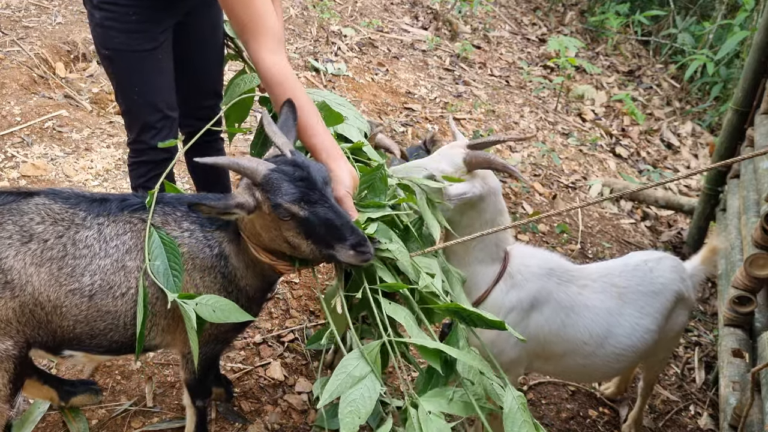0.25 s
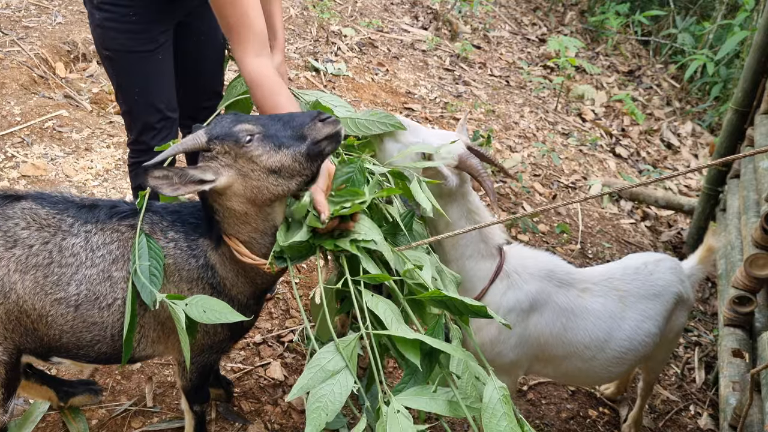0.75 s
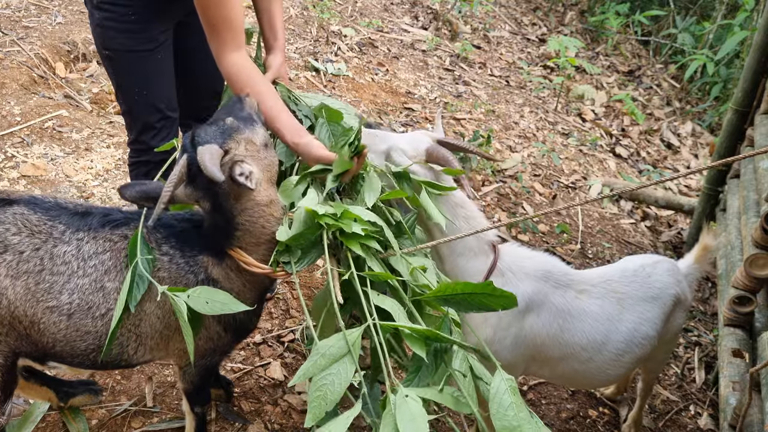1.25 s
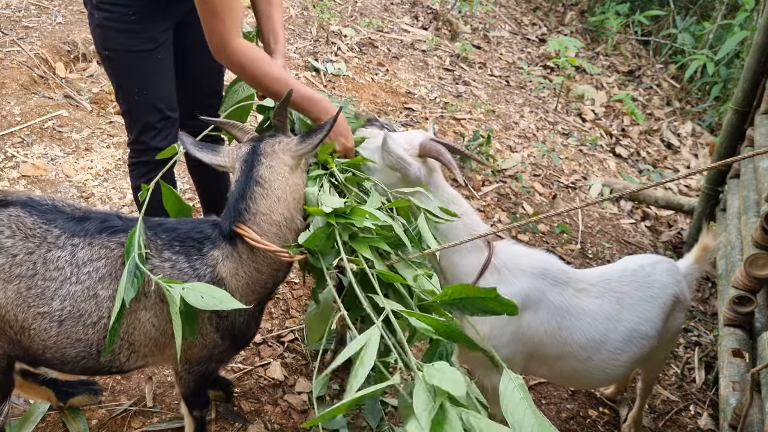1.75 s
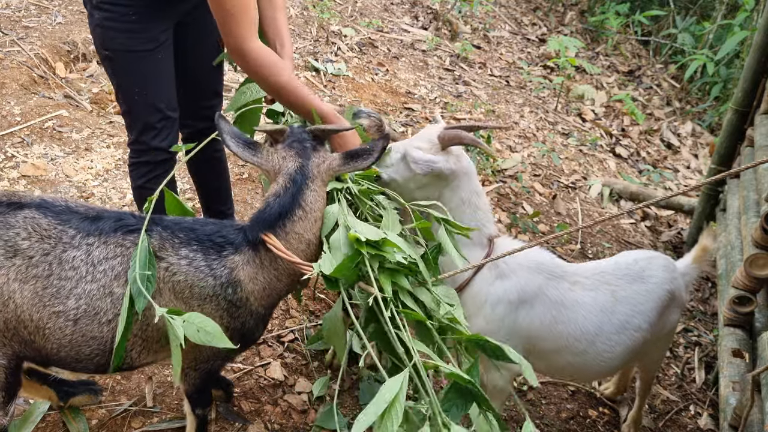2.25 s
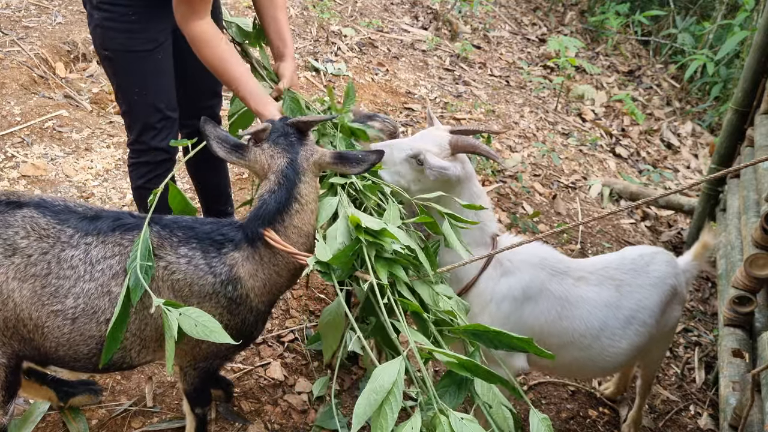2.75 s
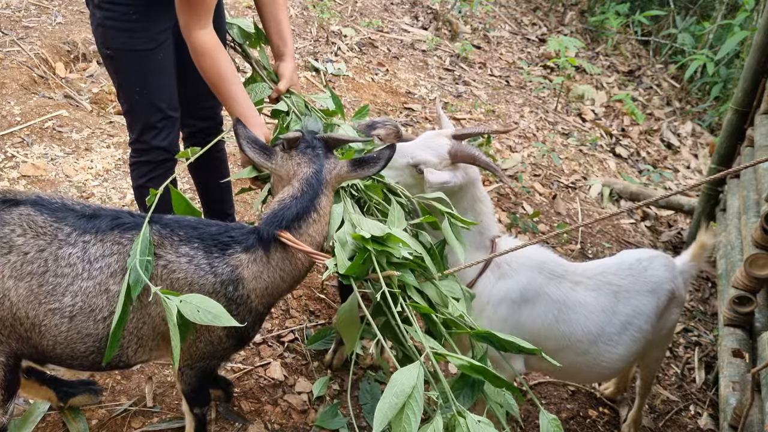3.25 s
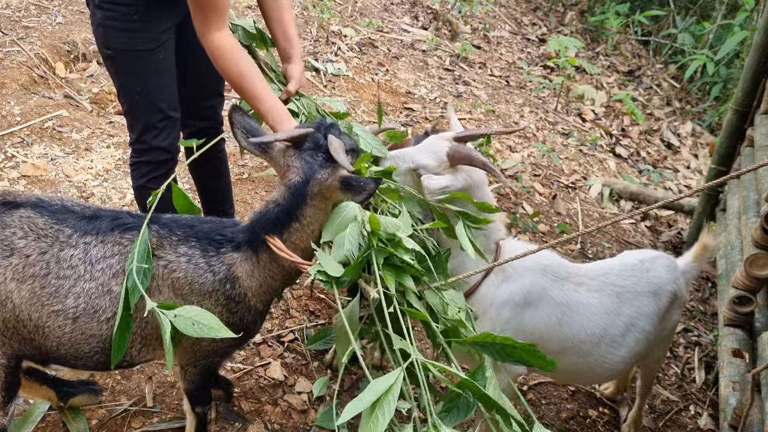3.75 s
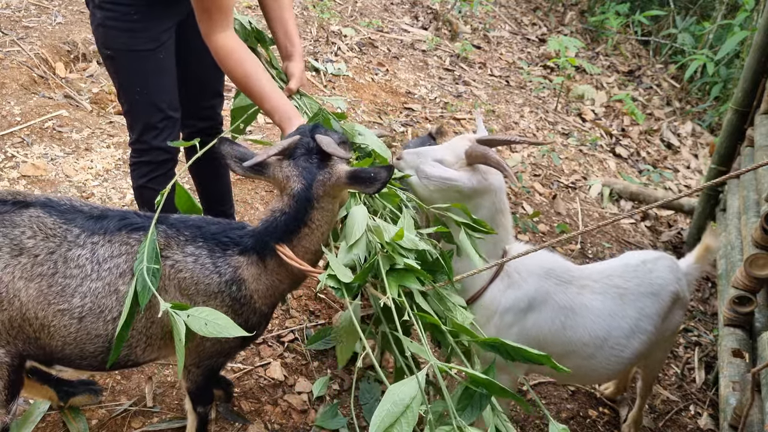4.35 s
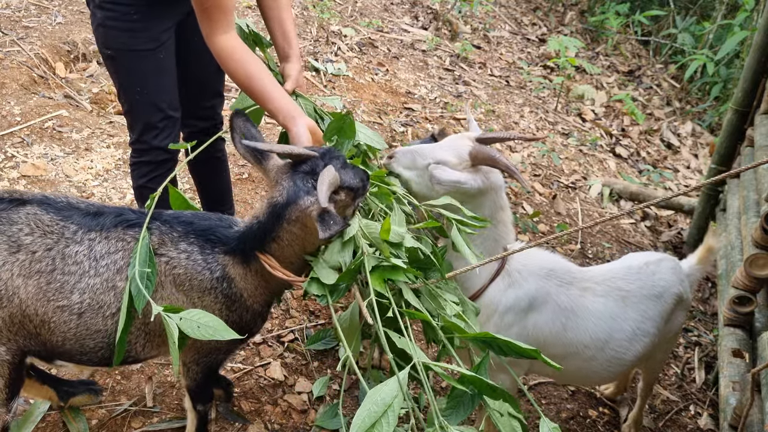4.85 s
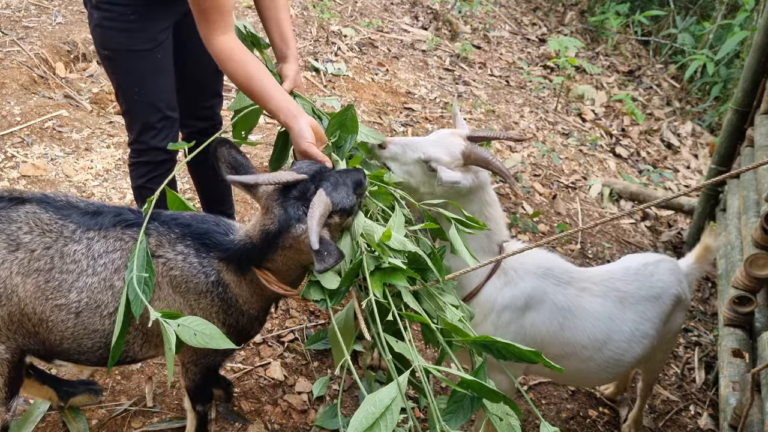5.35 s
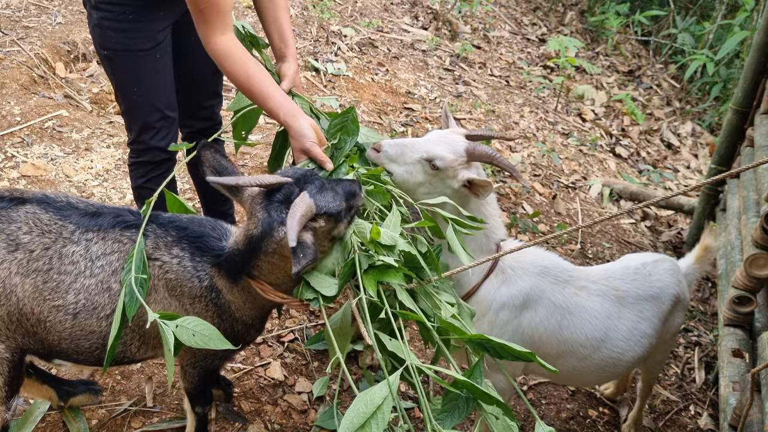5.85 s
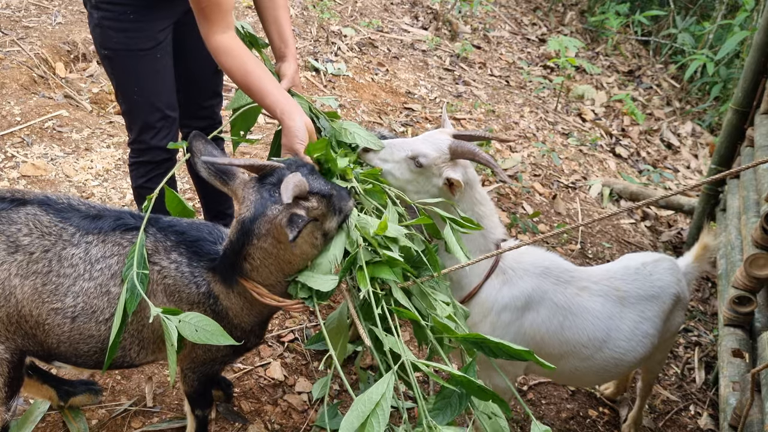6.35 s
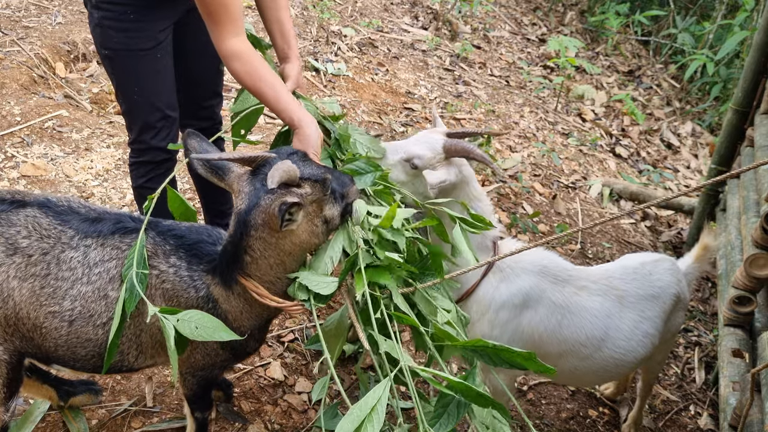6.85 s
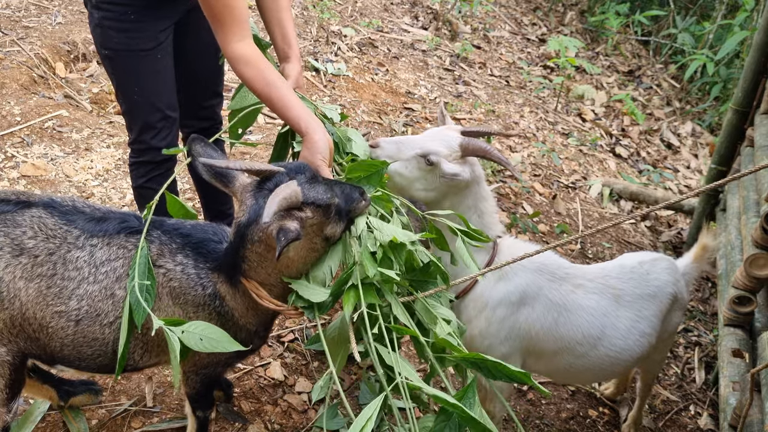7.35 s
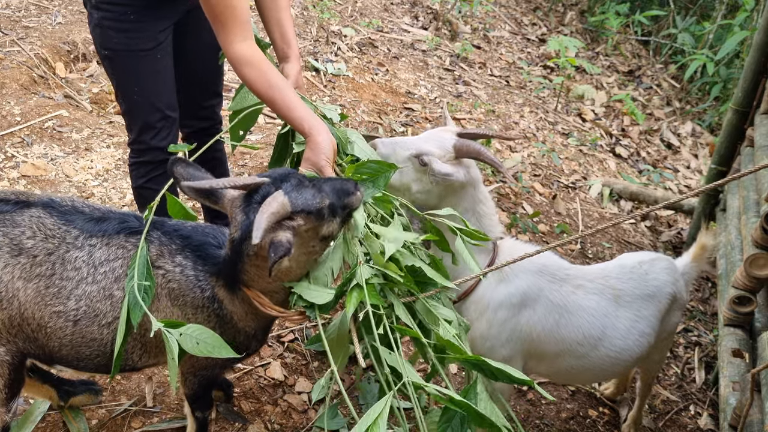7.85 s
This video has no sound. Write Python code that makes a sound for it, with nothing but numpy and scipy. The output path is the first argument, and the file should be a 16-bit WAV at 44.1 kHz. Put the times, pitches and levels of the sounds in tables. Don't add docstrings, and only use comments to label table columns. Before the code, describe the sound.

Close outdoor stereo from a handheld phone: goats feeding on branches, quiet at first with soft thuds, then busier with sharp wood cracks and tearing leaves. One short, dull-ended bell clink sounds in the first half; other bell touches are barely audible. The snapping returns in bursts toward the end. Behind it lie a steady high cicada hiss, distant bird whistles and faint wind rumble, with little echo.

```python
import sys
import numpy as np
from scipy import signal
from scipy.fft import rfft, irfft
from scipy.io import wavfile
from scipy.ndimage import uniform_filter1d

SR = 44100
rng = np.random.default_rng(int(sys.argv[2]) if len(sys.argv) > 2 else 0)


def to_linear_factor(level_db):
    exponent = np.asarray(level_db, float) / 20
    return 10 ** exponent


def bounce(signal):
    frames = np.transpose(np.atleast_2d(signal))
    limited = np.clip(frames, -1, 1)
    pcm = np.round(limited * 32767).astype(np.int16)
    wavfile.write(sys.argv[1], SR, pcm)


N = 356769
T = np.arange(N) / SR

# (frequency [Hz], density [dB per Hz]), and its treble continuation
AIR_SPECTRUM = [(15, -59), (25, -32), (40, -10), (71, -3), (154, -5), (188, -5), (342, -7.5), (399, -8),
                (499, -2.5), (927, -4.5), (1080, -7), (5000, -14), (6500, -55), (11000, -120)]
AIR_TREBLE = [(6000, -19), (8000, -32), (9500, -38), (16000, -29)]
# (frequency [Hz], coherence [0-1])
COHERENCE = [(60, 0.94), (130, 0.86), (290, 1), (640, 0.39), (1410, -0.12), (3100, -0.0), (6820, 0.27),
             (15000, 0.3)]
# (frequency [Hz], left minus right [dB])
AIR_BALANCE = [(60, 4.5), (110, 3.5), (200, 4.5), (380, 1), (700, 4), (1290, -2), (2380, 1.5), (4400, -7),
               (8120, 38), (15000, -20)]
# (centre [Hz], width [Hz], level [dB], left minus right [dB])
CHOIRS = [
    (5768, 540, -58.5, 7),
    (6612, 150, -77, 25),
    (5424, 590, -64.5, -4),
]
# (time [s], pitch [Hz], level [dB])
NEAR_CICADA = [(0, 8100, -85), (.9, 8200, -79), (1.3, 8250, -70), (1.7, 7850, -68.5), (2.2, 7500, -69),
               (2.4, 7600, -78), (8.09, 7800, -78)]
# (time [s], pitch [Hz], level [dB])
HIGH_CICADA = [(0, 10400, -92), (.35, 10400, -82), (.8, 10100, -83), (1.2, 9600, -87), (1.5, 9400, -100),
               (8.09, 9400, -100)]
# (time [s], length [s], start pitch [Hz], rise [Hz], level [dB])
BIRD_NOTES = [(0, .25, 3680, 30, -63), (.29, .11, 3400, -20, -67), (1.64, .05, 4150, 80, -64),
              (1.83, .05, 2600, 40, -66), (2.0, .13, 3750, 50, -68), (2.95, .3, 3660, 170, -66),
              (3.45, .3, 3630, 90, -66), (5.9, .24, 3660, 140, -64), (6.33, .3, 3650, 220, -64),
              (6.77, .04, 4550, 90, -66), (6.9, .27, 3680, 70, -66), (7.43, .25, 3660, 20, -64),
              (7.68, .04, 3450, -150, -69)]
# (time [s], length [s], pitch [Hz], level [dB], swell over the length [dB])
WHISTLES = [
    (.04, .19, 4505, -61, 6),
    (.465, .19, 4035, -62, -1),
]
# (time of peak [s], level [dB])
PUFFS = [(.03, -70), (.57, -57), (1.44, -65), (2.12, -69), (2.55, -61), (2.98, -58.5), (3.3, -63),
         (3.62, -59.5), (4.03, -63.5), (4.88, -65), (5.27, -65), (5.58, -62), (5.74, -60.5), (6.31, -74),
         (6.64, -60.5), (6.96, -66.5), (7.28, -69), (8.02, -71)]
# (time [s], level [dB], resonance [Hz], t60 [s])
THUDS = [(0.281, -54, 246, 0.2), (0.543, -52.5, 340, 0.077), (1.119, -65, 183, 0.12),
         (1.38, -57, 132, 0.16), (1.549, -56.5, 334, 0.18), (2.138, -60, 206, 0.32),
         (2.816, -53.5, 238, 0.14), (3.658, -60.5, 186, 0.092), (4.015, -59, 225, 0.17),
         (6.039, -61.5, 261, 0.16), (7.43, -72, 139, 0.12), (7.783, -57.5, 282, 0.35),
         (7.829, -55.5, 149, 0.14)]
# (time [s], level [dB])
STIRRING = [(0.0, -71.5), (0.11, -77.5), (1.96, -68.5), (2.46, -71.5), (2.7, -62), (2.86, -71.5),
            (3.06, -72.5), (3.85, -70), (4.35, -75.5), (4.89, -73), (5.29, -76), (6.22, -74.5), (6.74, -74),
            (7.1, -67), (7.48, -75.5), (8.09, -73)]
# (time [s], crisp top [dB], wood pitch [Hz], wood level [dB])
TWIGS = [(1.2256, -50, 703, -46), (1.5347, -37.5, 3700, -43.5), (1.9215, -53, 2500, -54),
         (1.9434, -63, 2850, -41.5), (2.0042, -64, 3790, -43), (2.128, -54, 2870, -33.5),
         (2.1513, -56, 3300, -27), (2.2638, -61, 3820, -53), (2.4838, -51, 3440, -44),
         (3.253, -62, 3690, -48), (3.4707, -52, 791, -45), (4.0118, -61, 3200, -35),
         (4.0196, -51, 1670, -42), (4.8299, -50, 1730, -53), (5.9924, -60, 1660, -48),
         (6.0196, -57, 1860, -40), (6.0287, -47, 1780, -45), (6.2884, -57, 1160, -49),
         (6.8776, -47.5, 1680, -36.5), (6.9726, -33.5, 1690, -35), (7.2664, -64, 1480, -46),
         (7.501, -36, 1330, -49), (7.5151, -39, 1330, -46.5), (7.677, -52, 3560, -59)]
# (time [s], crisp top [dB], body pitch [Hz], body level [dB])
SPLASH_AND_CRACK = [
    (2.537, -37.5, 4570, -36),
    (2.817, -36, 4230, -49),
]
# (time [s], level [dB], pitch [Hz])
TICKS = [(1.398, -62, 4000), (2.6618, -44, 2500), (2.868, -52, 4000), (3.386, -50, 4200),
         (3.416, -62, 3000), (3.449, -55, 1500), (3.929, -55, 3000), (4.267, -53.5, 2000),
         (4.889, -50.5, 3700), (4.977, -57, 1500), (5.151, -50.5, 3000), (5.195, -53, 1200),
         (5.512, -52.5, 7500), (5.626, -52, 1400), (5.856, -57, 800), (6.135, -58, 1200),
         (5.932, -62, 1400), (7.113, -53, 1500), (7.386, -58, 1300), (7.723, -56, 3500), (7.823, -54, 1300)]
# (time [s], crisp top [dB], stem pitch [Hz], stem level [dB], t60 [s])
TEARS = [(1.23, -57, 3200, -51, .18), (1.541, -46, 1500, -56, 0.092), (2.117, -56, 1390, -41.5, 0.16),
         (2.136, -47, 1180, -39, 0.11), (2.141, -54, 3000, -35, .08), (2.157, -55, 3370, -45, 0.16),
         (2.826, -48, 3500, -50, .1), (2.84, -53, 2800, -51, 0.13), (3.618, -58, 3300, -59, 0.59),
         (4.037, -51, 2740, -43, 0.13), (4.047, -55, 940, -46.5, 0.17), (4.056, -55, 1700, -49, 0.15),
         (4.745, -61, 1200, -58, .2), (6.009, -59, 1300, -45, .15), (6.024, -53, 3500, -45, 0.17),
         (5.96, -62, 1000, -53.5, .25), (6.053, -59, 1440, -46.5, .2), (6.914, -53, 3520, -48.5, 0.12),
         (6.951, -50, 1700, -42, 0.057), (6.976, -50, 4520, -37, 0.094), (7.322, -71, 1800, -45.5, .12),
         (7.338, -65, 1100, -46, .08), (8.005, -62, 1900, -50, .35)]
# (frequency [Hz], level [dB], t60 [s], left minus right [dB])
HUM = [
    (1466.4, -15.8, .454, -3.6),
    (1452.2, -24.3, .32, -1.5),
    (1479.3, -31, .8, -3),
]
UPPER_HZ = [3800, 3931, 3919, 4900, 7219, 7320, 9140, 9727, 10050, 10213, 11545, 12426, 13825, 14570]
# (level [dB], t60 [s], left minus right [dB])
UPPER_MODES = [(-43, 0.14, -13), (-36.5, 0.11, -22), (-51, 0.9, -13), (-52, 0.05, 2), (-48, .17, 15),
               (-34, 0.17, 15), (-50, .13, 6), (-49, 0.13, 20), (-57, .1, 6), (-47, 0.13, 5),
               (-51, 0.09, 11), (-44, 0.12, 15), (-45, 0.12, 12), (-60, .07, 6)]
# (time [s], strength [dB], contact [s], time until the ring is smothered [s])
STRIKES = [
    (.02, -46, .004, .5),
    (.09, -48, .004, .5),
    (.17, -46, .004, .15),
    (2.5367, .1, .0034, .225),
    (3.75, -46, .004, .15),
]

PORT_LAG = 17


def unit(x):
    return x / np.sqrt(np.mean(x ** 2))


def sides(db):
    return to_linear_factor(np.array([[.5], [-.5]]) * db)


def band(x, lo_hz, hi_hz, order=2):
    sos = signal.butter(order, [lo_hz, min(hi_hz, .45 * SR)], "band", fs=SR, output="sos")
    return signal.sosfilt(sos, x)


def walk(rate_hz):
    hold = int(SR / rate_hz)
    steps = np.repeat(rng.standard_normal(N // hold + 1), hold)[:N]
    smooth = uniform_filter1d(uniform_filter1d(steps, hold), hold)
    return smooth / smooth.std()


def on_log(hz, table):
    f, value = np.transpose(table)
    return np.interp(np.log(hz + 1), np.log(f + 1), value)


def add(out, s, x):
    i = int(s * SR)
    out[:, i:i + x.shape[1]] += x[:, :N - i]


def narrow(hz, half_width_hz):
    low_pass = signal.butter(2, half_width_hz, fs=SR, output="sos")
    slow = signal.sosfilt(low_pass, rng.standard_normal((2, 2, N)))
    phase = 2 * np.pi * np.cumsum(hz) / SR
    return unit(slow[0] * np.sin(phase) + slow[1] * np.cos(phase))


def air():
    hz = np.arange(N // 2 + 1) * SR / N
    shared, left, right = rfft(rng.standard_normal((3, N)))
    late = shared * np.exp(-2j * np.pi * hz * PORT_LAG / SR)
    coherence = np.clip(on_log(hz, COHERENCE), 0, 1)
    common = np.sqrt(coherence) * np.array([late, shared])
    ports = common + np.sqrt(1 - coherence) * np.array([left, right])
    colour = to_linear_factor(on_log(hz, AIR_SPECTRUM[:-1] + AIR_TREBLE)) * sides(on_log(hz, AIR_BALANCE))
    wash = irfft(ports * colour, N)
    return unit(wash) * to_linear_factor(-58.5 + 0.53 * walk(3.52))


def cicadas():
    out = np.zeros((2, N))
    for hz, width_hz, db, pan_db in CHOIRS:
        choir = band(rng.standard_normal((2, N)), hz - width_hz / 2, hz + width_hz / 2)
        swell_db, flicker_db = 0.2 * walk(1.6), 1.1 * walk(40)
        out += unit(choir) * to_linear_factor(db + swell_db + flicker_db) * sides(pan_db)
    for singer in (NEAR_CICADA, HIGH_CICADA):
        s, hz, db = np.transpose(singer)
        level = to_linear_factor(np.interp(T, s, db) + 1.5 * walk(14))
        out += narrow(np.interp(T, s, hz), 280) * level * sides(7.0)
    return out


def bird_notes():
    hz, gain = np.full(N, 3700.), np.zeros(N)
    for s, length, first_hz, rise_hz, db in BIRD_NOTES:
        a, n = int(s * SR), int(length * SR)
        hz[a:a + n] = first_hz + rise_hz * T[:n] / length
        gain[a:a + n] = np.hanning(n) ** .3 * to_linear_factor(db + 2.5)
    return narrow(hz, 95) * gain * sides(2.7)


def whistles():
    out = np.zeros((2, N))
    edge_s, rise_hz_per_s = .018, 150
    for s, length, hz, db, swell_db in WHISTLES:
        t = np.arange(0, length, 1 / SR)
        port_phase = np.array([[0], [1.6]])
        tone = np.sin(2 * np.pi * (hz + rise_hz_per_s * t / 2) * t + port_phase)
        ends = np.clip(np.minimum(t, length - t) / edge_s, 0, 1) ** 2
        add(out, s, tone * to_linear_factor(db + swell_db * t / length) * ends)
    return out * (1 + 0.32 * walk(55)) * sides(2.5)


def breeze():
    db = np.full(N, -82.)
    rise_db_per_s, fall_db_per_s = 84, 68
    for s, peak_db in PUFFS:
        drop_db = np.where(T < s, rise_db_per_s * (s - T), fall_db_per_s * (T - s))
        db = np.maximum(db, peak_db - drop_db)
    gust, own = unit(band(rng.standard_normal((2, N)), 54.6, 99))
    return to_linear_factor(db - 5.5) * np.array([gust, gust + 0.63 * own]) * sides(7.7)


def thuds():
    out, t = np.zeros((2, N)), T[:SR // 4]
    for s, db, hz, t60 in THUDS:
        body = unit(band(rng.standard_normal(len(t)), 0.63 * hz, 1.5 * hz))
        knock = body * (1 - np.exp(-t / 0.0023))
        add(out, s, knock * to_linear_factor(db + 2.0 - 60 * t / max(t60, .02)) * sides(1.8))
    return out


def leaves():
    s, db = np.transpose(STIRRING)
    ticks = (rng.random(N) < 1500 / SR) * to_linear_factor(1.2 * rng.exponential(size=N))
    smear = signal.lfilter([1], [1, -np.exp(-1 / (0.0026 * SR))], ticks)
    grain = np.sqrt(smear + 0.042) * rng.standard_normal((2, N)) * to_linear_factor(1.2 * walk(25))
    stir_db = np.interp(T, s, db)
    top = unit(band(grain, 4700, 14400)) * sides(5.6) * to_linear_factor(stir_db + 4.5)
    middle = unit(band(grain, 900, 5280)) * to_linear_factor(0.8 * (stir_db + 75.5) - 63.5)
    return top + middle


def snaps(table, crack, rise_s, scatter_db):
    out, t = np.zeros((2, N)), T[:SR // 5]
    spread = 1.336
    for s, crisp_db, hz, wood_db, t60 in table:
        scatter = rng.exponential(size=len(t) // 30 + 1).repeat(30)[:len(t)]
        fibres = rng.standard_normal((2, len(t))) * to_linear_factor(scatter_db * scatter)
        fibres[1] = 0.15 * fibres[0] + fibres[1]
        spray = to_linear_factor(-60 * t / max(t60, .005)) * (1 - np.exp(-t / rise_s))
        first_crack = crack * np.sign(fibres[0]) * np.exp(-t / .0004)
        burst = (fibres * spray + first_crack) / 2
        top = to_linear_factor(crisp_db - 10) * sides(5) * band(burst, 2000, 20000)
        ring = np.sqrt(SR / hz) * band(burst, hz / spread, hz * spread)
        wood = to_linear_factor(wood_db - 4.5) * ring * sides(-1.7)
        skirt_db = (wood_db + crisp_db) / 2 + 6.5
        skirt = sides(7.5) * to_linear_factor(skirt_db) * band(burst, 450, 7500, order=1)
        add(out, s + 0.0004, top + wood + skirt)
    return out


def branches():
    cracks = [(*row, .04) for row in TWIGS + SPLASH_AND_CRACK]
    ticks = [(s, db, hz, db - 2, .04) for s, db, hz in TICKS]
    sharp = snaps(cracks, 2.6, .0003, 1.5) + snaps(ticks, 1.8, .0003, 1.5)
    return sharp + snaps(TEARS, .6, .001, 2.5)


def bell():
    out, t = np.zeros((2, N)), T[:SR // 2]
    modes = HUM + [(hz, *rest) for hz, rest in zip(UPPER_HZ, UPPER_MODES)]
    for s, db, contact, smother in STRIKES:
        for hz, mode_db, t60, pan_db in modes:
            rise = 1 - np.exp(-(t / contact) ** 2 * hz / HUM[0][0])
            fall = to_linear_factor(db + mode_db - 60 * t / t60) * np.exp(-(t / smother) ** 3)
            add(out, s, rise * fall * np.sin(2 * np.pi * hz * t) * sides(pan_db))
    return out


def scene():
    low = breeze() + thuds()
    low[0] = np.roll(low[0], PORT_LAG)
    background = air() + cicadas() + bird_notes() + whistles()
    return background + low + leaves() + branches() + bell()


def band_limit(x):
    return signal.sosfilt(signal.butter(12, 16800, fs=SR, output="sos"), x)


def record(dry):
    dip_hz = 9500
    dipped = dry - 0.31 * band(dry, dip_hz / 1.18, dip_hz * 1.095, order=1)
    top_cut = signal.ellip(8, .2, 45, 15550, fs=SR, output="sos")
    mix = signal.sosfilt(top_cut, dipped)
    return band_limit(mix)


dry = scene()
out = record(dry)
bounce(out)
```